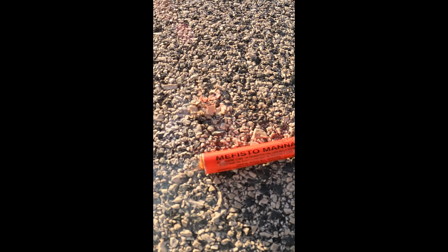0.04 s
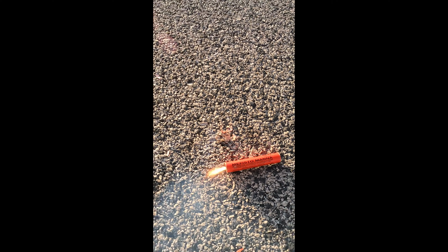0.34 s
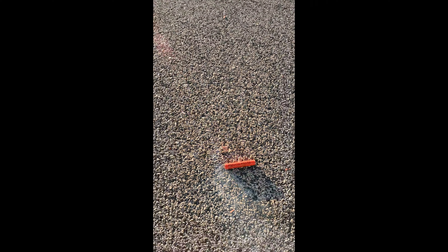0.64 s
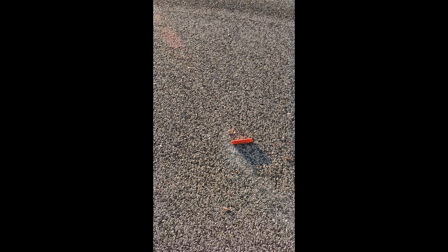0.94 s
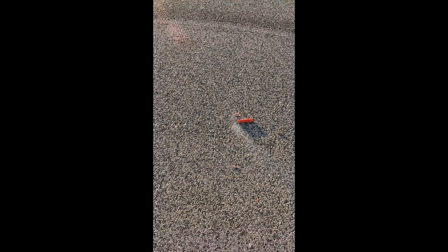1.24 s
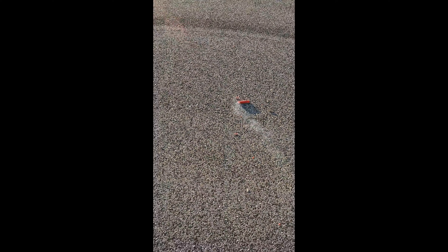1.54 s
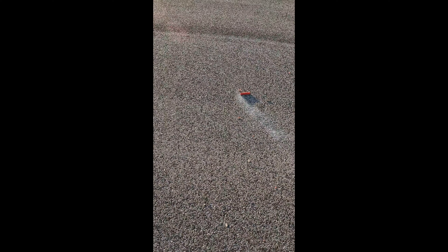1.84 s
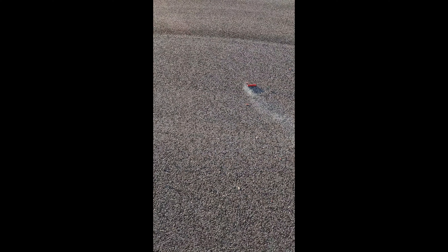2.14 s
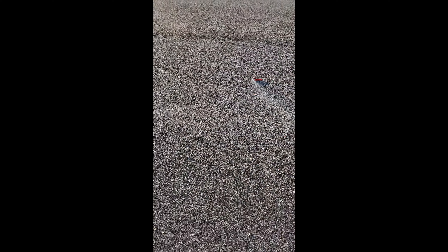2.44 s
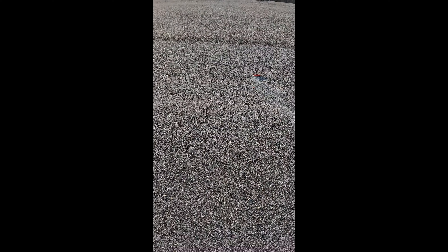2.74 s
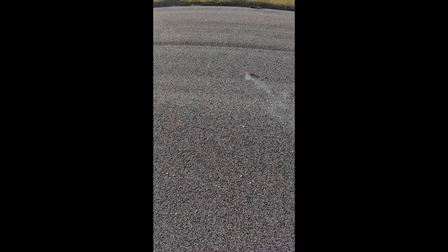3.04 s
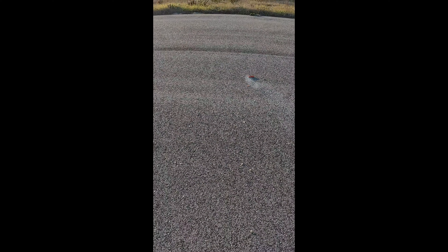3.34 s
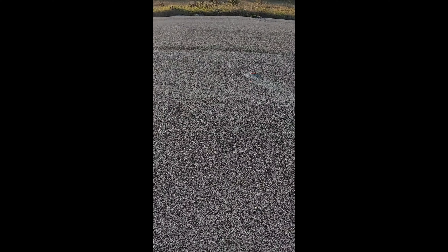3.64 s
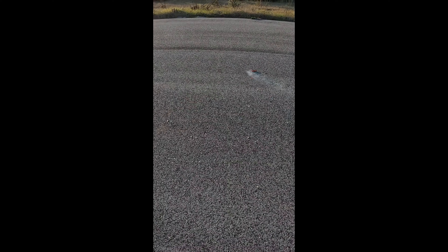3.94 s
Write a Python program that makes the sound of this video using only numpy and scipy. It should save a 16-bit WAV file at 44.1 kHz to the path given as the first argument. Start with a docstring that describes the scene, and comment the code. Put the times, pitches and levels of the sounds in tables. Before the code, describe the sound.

A firecracker fuse hisses and sputters close up, then fades under faint footsteps outdoors.

```python
"""Outdoors on asphalt, hand-held stereo microphone right beside a burning firecracker fuse.
At first the gas jet hisses, spurts, puffs on the microphone, turns hollow and spits.
The hiss dulls and fades as the recordist backs away: five soft steps, grit ticking underfoot.
About two seconds in, one faint bird chirps far off; near three, light wind swells on the microphone.
In the distance throughout: a low rumble with an engine-like hum, and the tyres of traffic."""
import sys
import numpy as np
from scipy import signal
from scipy.fft import rfft, irfft
from scipy.io import wavfile
from scipy.ndimage import map_coordinates

SR = 44100
rng = np.random.default_rng(int(sys.argv[2]) if len(sys.argv) > 2 else 0)


def file_out(sig):
    """Save sig as 16-bit WAV at sys.argv[1]."""
    # one column per channel
    cols = np.atleast_2d(sig).T
    # limit, then scale
    lim = np.clip(cols, -1, 1)
    pcm = np.round(lim * 32767).astype(np.int16)
    wavfile.write(sys.argv[1], SR, pcm)


N = 176400
TIME = np.arange(N) / SR
BINS = np.fft.rfftfreq(N, 1 / SR)

# stereo width of close and distant sound (f/Hz, side against mid/dB)
NEAR_WIDTH = [(40, -14), (150, -24), (700, -23), (1400, -18), (3000, -13), (6000, -8.5), (11000, -1.5)]
FAR_WIDTH = [(40, -9), (150, -12), (1300, -4), (3500, -2), (11000, 0)]
# balance of the two microphone ports (f/Hz, left minus right/dB)
NEAR_BALANCE = [(50, -1.5), (1200, -0.4), (3000, 0), (6000, 2.5), (11000, 1.5)]
FAR_BALANCE = [(50, -0.9), (300, 1.5), (1300, 5), (3000, -0.7), (11000, 0.5)]
# phase between the ports (f/Hz, lead of left/rad)
PORT_LEAD = [(100, -0.054), (1200, -0.14), (3300, -0.48), (6500, -0.43), (11000, -0.21)]

# wind on the microphone and distant engine (t/s, level/dB)
WIND_LEVEL = [(0, -50), (1, -45.5), (2.7, -45), (2.88, -34), (3.2, -42), (4, -38)]
ENGINE_LEVEL = [(0, -35), (.8, -40.5), (1.2, -39), (1.7, -37.5), (2.1, -40), (2.6, -40.5), (3.1, -43),
                (3.7, -40), (4, -41)]
# spectra of wind, steady microphone hiss, engine rumble and tyres (f/Hz, relative level/dB)
WIND_SPECTRUM = [(4, 2), (11, 6), (28, 8.5), (45, -7), (80, -19), (200, -48.5), (2000, -95)]
MIC_HISS_SPECTRUM = [(300, 12.5), (2500, -1), (5000, 2.5), (6200, -1.5), (7500, -1.5), (8500, -8),
                     (9500, -6.5), (10800, -2), (12000, -5), (13300, -7), (14400, -28)]
RUMBLE_SPECTRUM = [(20, -1), (40, -2.5), (58, 4.5), (76, -11), (105, -13), (150, -18), (190, -19.5),
                   (240, -31), (380, -46), (2500, -76)]
TYRE_SPECTRUM = [(200, -9), (450, -10.5), (720, -8), (1020, 1.5), (1400, -2), (1700, -3.5), (2200, -15.5),
                 (3200, -25), (6000, -56)]
# lines of the engine's hum (f/Hz, level against the rumble/dB)
HUM_LINES = [(79.5, -7.5), (100, -18), (124, -17.5)]
# distant traffic (t/s, level/dB, tyre pitch/ratio)
TRAFFIC_FLOW = [(0, -66.5, 1.05), (1.25, -58.5, 0.88), (1.6, -57, 1.06), (2.2, -56, 1.077),
                (2.55, -62, 0.97), (2.78, -60.5, 1.06), (3.1, -59, 1), (3.65, -55, 1.005), (4, -62, 0.99)]

# the fuse spitting, then grit underfoot (t/s, level/dB, centre/Hz, width/octaves, decay/s, top/Hz)
DRY_TICKS = [(0.535, -40, 3000, 0.79, .003, 12000), (0.627, -41, 2000, 1.7, .003, 10000),
             (.696, -38.5, 2000, 3, 0.0045, 7000), (0.948, -33.5, 1400, 1.15, 0.0031, 14000),
             (1.066, -43.5, 1500, 1.9, 0.0024, 7000), (1.5079, -38.5, 1700, 0.65, 0.005, 3400),
             (1.982, -47, 7000, 1.2, 0.0007, 14000), (2.136, -48.5, 7800, 0.57, 0.00064, 14000),
             (2.8977, -38, 1550, 0.27, 0.0012, 7000), (3.48, -44, 5960, 2, 0.0017, 14010),
             (3.492, -46, 5500, 0.26, 0.0011, 13030), (3.5235, -47, 2500, 0.62, 0.0011, 8000),
             (3.5585, -42, 1900, 0.39, 0.001, 7000), (3.5638, -45.5, 2000, 1, 0.0043, 8000),
             (3.5854, -33, 1900, 1.8, 0.00097, 11000), (3.6575, -37.5, 2660, 0.8, 0.0013, 7800),
             (3.6624, -36.5, 3220, 0.95, 0.0014, 7500)]
# spectra of ticks, scuffing sole and loose grit (f/Hz, relative level/dB)
TICK_SPECTRUM = [(200, 22), (1000, 5.5), (2800, 1.5), (4200, -2.5), (7500, -6), (11000, -12), (14000, -6)]
SCUFF_SPECTRUM = [(60, -7), (180, 12), (400, -1), (520, -2), (800, -1), (1150, -8), (1500, -7),
                  (3000, -20.5), (4000, -50), (12000, -56)]
GRIT_SPECTRUM = [(500, -42), (2500, 9), (4500, -2), (7000, -1), (9000, -2.5), (11000, -2.5), (14000, -11)]
# strikes of heel and sole (t/s, level/dB, pitch/ratio, ring time/ratio)
SHOE_STRIKES = [(.948, -29.5, 0.84, 0.42), (.968, -29.5, .98, 1), (.9755, -32.5, 1.04, 1),
                (.9855, -39, 1.45, 0.53), (1.5087, -34, 0.79, 0.3), (1.522, -37, 1.07, .4)]
# modes of the shoe (f/Hz, relative level/dB, decay/s)
SHOE_MODES = [(388, -2.5, 0.012), (770, -1, 0.0098), (1400, -12, 0.0031)]
# the recordist's steps (t/s, length/s, thump/dB, thump/Hz, scuff/dB, grit/dB)
FOOTFALLS = [(0.951, 0.043, -44.5, 204, -38.5, -54), (1.507, 0.027, -32.5, 188.5, -36.5, -58.5),
             (2.128, 0.016, -38, 373, -42.5, -66), (2.814, 0.0068, -30, 213, -52, -64),
             (3.472, 0.026, -42, 220, -47.5, -63)]

# thin sizzle of the fuse (t/s, level/dB)
SIZZLE_LEVEL = [(0, -39.5), (.4, -69), (.6, -67), (.85, -83), (1.4, -85), (4, -85)]
# puffs of gas hitting the microphone (t/s, peak/dB, centre/Hz)
GAS_PUFFS = [(.1095, -13.5, 260), (.1205, -13.5, 160), (.131, -13.5, 136), (.1495, -12, 148),
             (.222, -20, 380), (0.276, -19.5, 187), (0.293, -12.5, 180), (.313, -13.5, 115)]
# spurts of flame (t/s, length/s, roar/dB, gust/dB)
FLAME_SPURTS = [(0.077, 0.007, -18.5, -26), (0.1107, 0.042, -17.5, -25), (0.189, 0.027, -23, -32),
                (0.22, 0.014, -21, -25), (0.2699, 0.03, -18, -27.5), (0.307, 0.0057, -34, -31)]
# spectra of a spurt's roar and of its gust on the microphone (f/Hz, relative level/dB)
ROAR_SPECTRUM = [(60, -63), (300, -1), (900, 1.5), (1500, 1.5), (2500, -2), (4200, -8.5), (5500, -11.5),
                 (7300, -20.5), (8500, -23), (14000, -49)]
GUST_SPECTRUM = [(20, -16), (70, -6), (120, 0.5), (200, -5), (350, -7), (700, -18.5), (8000, -74)]
# the fuse's jet at the microphone (t/s, level/dB, dullness/0-1)
JET_COURSE = [(0, -22, 0), (0.061, -20.5, 0.2), (.098, -25, 0.15), (.17, -24.5, 0.05), (.25, -24, 0.22),
              (.325, -26, 0.47), (.365, -21, 0.49), (.42, -22, 0.66), (.49, -26.5, 0.88), (.53, -29, 0.69),
              (0.557, -37, 0.96), (.63, -39.5, 0.97), (.66, -49, 0.86), (.76, -58.5, 0.3), (.93, -61, 0.14),
              (1.6, -62, 0.44), (2.5, -74, 0.2), (4, -66.5, 0.3)]
# spectra of the jet, facing it and off its axis (f/Hz, relative level/dB)
JET_ON_AXIS = [(30, -15), (150, -7), (400, -7), (1000, -4.5), (2700, -1.5), (4200, -2), (5400, -9.5),
               (7200, -7), (8300, -19.5), (9600, -21.5), (10700, -19.5), (12500, -26.5), (14400, -27.5)]
JET_OFF_AXIS = [(30, -26), (150, 2), (400, -0.5), (760, -3.5), (1020, 0.5), (1350, -3.5), (1650, -4.5),
                (3200, -10.5), (4600, -16), (5600, -24), (7200, -30), (8500, -37.5), (11000, -44),
                (14400, -53)]


def amp(db):
    """Decibels to gain."""
    return 10 ** (np.asarray(db) / 20)


def unit(x):
    """Scales to rms 1."""
    return x / np.sqrt(np.mean(x ** 2) + 1e-20)


def per_bin(table):
    """A table over log frequency, at every bin."""
    hz, value = np.transpose(table)
    return np.interp(np.log(BINS + 1), np.log(abs(hz) + 1), value)


def per_sample(table):
    """A table over time, at every sample."""
    return np.interp(TIME, *np.transpose(table))


def wander(rate_hz):
    """Random drift of rms 1, mostly slower than rate_hz."""
    return unit(irfft(rfft(rng.standard_normal(N)) / (1 + (BINS / rate_hz) ** 4), N))


def noise():
    """Two unrelated white noises."""
    return rng.standard_normal((2, N))


def grains(per_s, spread_db):
    """Two unrelated trains of random clicks, uneven in size."""
    size = amp(spread_db * np.minimum(rng.exponential(1, (2, N)), 4))
    return unit(size * np.sign(noise()) * (rng.random((2, N)) < per_s / SR))


def burst(start, length, rise_s, fall_s):
    """Linear attack, hold and exponential release."""
    t = TIME - start
    return np.clip(t / rise_s, 0, 1) * np.exp(-np.maximum(t - length, 0) / fall_s)


def at_mic(drive, colour_db, width=NEAR_WIDTH, balance=NEAR_BALANCE):
    """Colours a mid and side pair and spreads it over the two microphone ports, at rms 1."""
    mid, side = rfft(drive) * amp(colour_db)
    side = side * amp(per_bin(width)) / 2
    lean = amp(per_bin(balance) / 2) * np.exp(.5j * per_bin(PORT_LEAD))
    return unit(irfft(np.array([(mid + side) * lean, (mid - side) / lean]), N))


def wide_noise(spectrum):
    """Coloured noise with the wide stereo image of the background."""
    return at_mic(noise(), per_bin(spectrum), FAR_WIDTH, FAR_BALANCE)


def wind_and_mic_hiss(hiss_db=-65.5):
    """Light wind on the microphone over its own steady hiss."""
    wind = wide_noise(WIND_SPECTRUM) * amp(per_sample(WIND_LEVEL))
    return wind + amp(hiss_db) * wide_noise(MIC_HISS_SPECTRUM)


def traffic(swell_db=.7):
    """Distant tyres swell, and shift a little in pitch as the cars move."""
    times, db, pitch = np.transpose(TRAFFIC_FLOW)
    tyres = wide_noise(TYRE_SPECTRUM)
    position = np.cumsum(np.interp(TIME, times, pitch))
    moving = np.array([map_coordinates(port, [position], order=3, mode="wrap") for port in tyres])
    return moving * amp(np.interp(TIME, times, db) + swell_db * wander(rate_hz=9))


def engine(drift=.012, waver_db=2):
    """A distant engine: low rumble with hum lines that drift together in pitch."""
    clock = np.cumsum(1 + drift * wander(rate_hz=2.19)) / SR
    hum = np.zeros(N)
    for hz, db in HUM_LINES:
        waver = amp(waver_db * wander(rate_hz=0.71))
        hum += amp(db) * unit(waver * np.sin(2 * np.pi * (hz * clock + rng.random())))
    return (wide_noise(RUMBLE_SPECTRUM) + hum) * amp(per_sample(ENGINE_LEVEL))


def bird(start_s=2.034, length_s=.034, note_hz=4260, scoop_hz=700, scoop_s=0.0045, db=-58.5):
    """One far chirp that scoops up to its note."""
    t = np.clip(TIME - start_s, 0, length_s)
    hz = note_hz - scoop_hz * np.exp(-t / scoop_s)
    return amp(db) * np.sin(np.pi * t / length_s) * np.sin(2 * np.pi * np.cumsum(hz) / SR)


def ticks(rise_s=0.00048, skirt_db=13):
    """Short dry ticks: the fuse spitting, then grit underfoot."""
    out = np.zeros((2, N))
    for start, db, hz, octaves, decay, top_hz in DRY_TICKS:
        band_db = -skirt_db * np.log10(1 + (np.log2((BINS + 1) / hz) / octaves) ** 2)
        top_db = -10 * np.log10(1 + (BINS / top_hz) ** 10)
        snap = burst(start, rise_s, rise_s, decay)
        out += amp(db) * np.std(snap) * at_mic(snap * noise(), per_bin(TICK_SPECTRUM) + band_db + top_db)
    return out


def knocks(rise_s=0.0013):
    """Heel, then sole, strike the ground and ring the hollow of the shoe."""
    out = np.zeros(N)
    for start, db, pitch, ring in SHOE_STRIKES:
        for hz, mode_db, decay in SHOE_MODES:
            mode = np.sin(2 * np.pi * hz * pitch * (TIME - start))
            out += amp(db + mode_db) * burst(start, rise_s, rise_s, decay * ring) * mode
    return out


def footsteps(peak_share=0.77):
    """Below the microphone, a soft thump swells while the sole scuffs over loose grit."""
    scuff = at_mic(grains(per_s=2500, spread_db=3), per_bin(SCUFF_SPECTRUM))
    grit = at_mic(grains(per_s=2500, spread_db=3), per_bin(GRIT_SPECTRUM))
    out = np.zeros((2, N))
    for start, length, thump_db, thump_hz, scuff_db, grit_db in FOOTFALLS:
        t = np.maximum(TIME - start, 0)
        growth = (t / (peak_share * length)) ** 2
        swell = growth * np.exp((1 - growth ** 2) / 2)
        out += amp(thump_db) * swell * np.cos(2 * np.pi * thump_hz * t)
        contact = burst(start, length, rise_s=0.0015, fall_s=.006)
        out += contact * (amp(scuff_db) * scuff + amp(grit_db) * grit)
    return out


def sizzle(centre_hz=10500, half_width_hz=760, flutter_db=2):
    """The thin top of the fuse's sound: a narrow band of very high, fluttering hiss."""
    band_db = -20 * np.log10(1 + ((BINS - centre_hz) / half_width_hz) ** 2)
    return at_mic(noise(), band_db) * amp(per_sample(SIZZLE_LEVEL) + flutter_db * wander(rate_hz=14))


def hollow(centre_hz=1164, half_width_hz=280, db=-26):
    """A broad, hollow colour around 1.2 kHz swells as the spurts end."""
    band_db = -10 * np.log10(1 + ((BINS - centre_hz) / half_width_hz) ** 4)
    return amp(db) * at_mic(noise(), band_db) * burst(start=0.26, length=0.12, rise_s=0.084, fall_s=0.059)


def puffs():
    """Each puff of gas is one short push of air that thuds on the microphone."""
    out = np.zeros(N)
    for peak_s, db, hz in GAS_PUFFS:
        phase_squared = (np.pi * hz * (TIME - peak_s)) ** 2
        out += amp(db) * (1 - 2 * phase_squared) * np.exp(-phase_squared)
    return out


def spurts(rise_s=.0015, fall_s=0.0063, pop_db=2, pop_s=0.00148, sputter_db=2.5):
    """The flame flares close up: a pop, a crackling roar, and a gust that buffets the microphone."""
    roar = at_mic(noise() + grains(per_s=2500, spread_db=2.5), per_bin(ROAR_SPECTRUM))
    roar *= unit(amp(sputter_db * wander(rate_hz=220)))
    gust = at_mic(noise(), per_bin(GUST_SPECTRUM))
    out = np.zeros((2, N))
    for start, length, roar_db, gust_db in FLAME_SPURTS:
        pop = amp(pop_db * burst(start, pop_s, rise_s, pop_s))
        out += burst(start, length, rise_s, fall_s) * (amp(roar_db) * pop * roar + amp(gust_db) * gust)
    return out


def fuse(sparks_db=-9, flutter_db=1.47):
    """An unevenly burning gas jet peppered with sparks; it dulls as the microphone leaves its axis."""
    times, db, dullness = np.transpose(JET_COURSE)
    dullness = np.clip(np.interp(TIME, times, dullness), 0, 1)
    drive = noise() + amp(sparks_db) * grains(per_s=1200, spread_db=4.5)
    stages = np.linspace(0, 1, 5)
    jet = np.zeros((2, N))
    for stage in stages:
        colour_db = (1 - stage) * per_bin(JET_ON_AXIS) + stage * per_bin(JET_OFF_AXIS)
        crossfade = np.interp(dullness, stages, stages == stage)
        jet += crossfade * at_mic(drive, colour_db)
    return jet * amp(np.interp(TIME, times, db) + flutter_db * wander(rate_hz=160))


def scene():
    """Fuse, feet and distance outdoors, with no reverberation."""
    firecracker = fuse() + hollow() + sizzle() + spurts() + puffs()
    steps_and_ticks = footsteps() + knocks() + ticks()
    background = bird() + engine() + traffic() + wind_and_mic_hiss()
    return background + steps_and_ticks + firecracker


def record(dry, ceiling=0.44, roll_off_hz=13100, edge_hz=14400):
    """Soft overload on the highest peaks, the microphone's top roll-off, then the band limit."""
    soft = dry / (1 + (dry / ceiling) ** 4) ** (1 / 4)
    rolled = irfft(rfft(soft) / np.sqrt(1 + (BINS / roll_off_hz) ** 24), N)
    band_limit = signal.firwin(255, edge_hz, window=("kaiser", 8), fs=SR)
    return signal.oaconvolve(rolled, band_limit[None], "same")


dry = scene()
out = record(dry)
file_out(out)
```